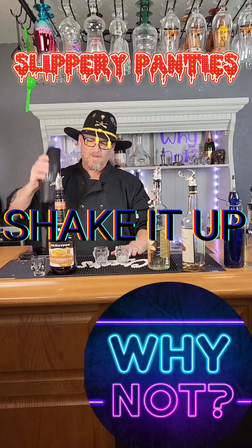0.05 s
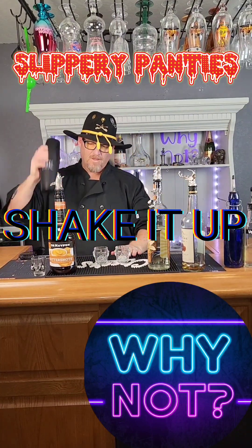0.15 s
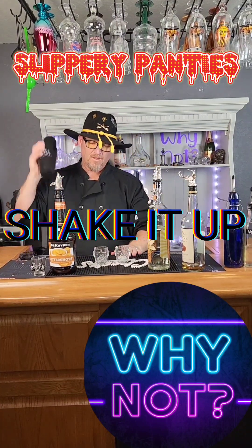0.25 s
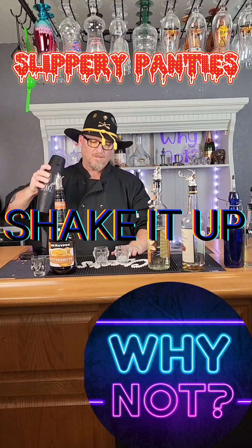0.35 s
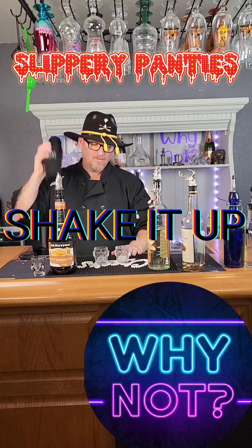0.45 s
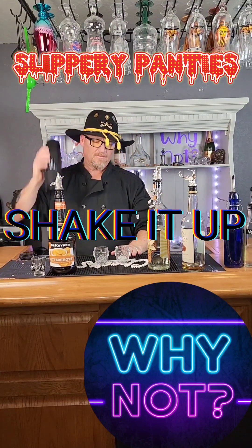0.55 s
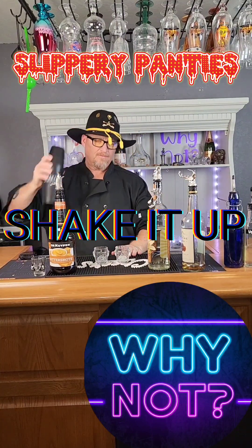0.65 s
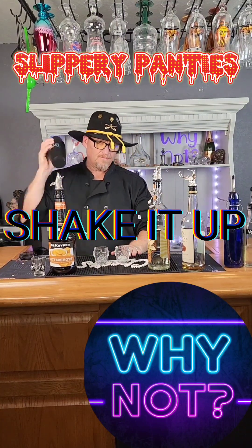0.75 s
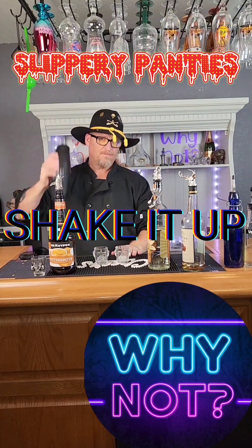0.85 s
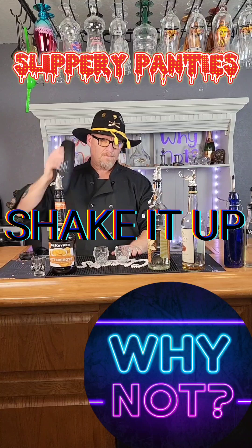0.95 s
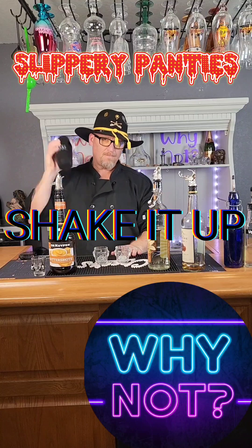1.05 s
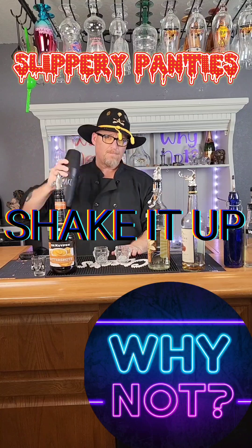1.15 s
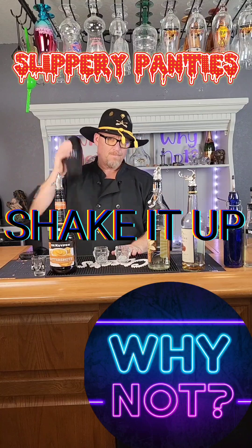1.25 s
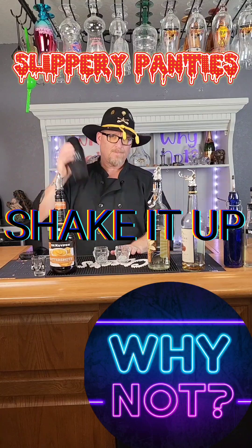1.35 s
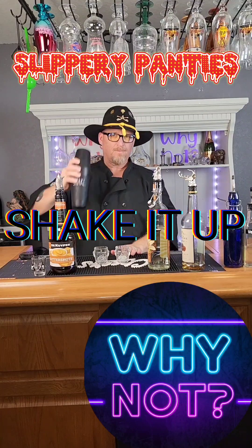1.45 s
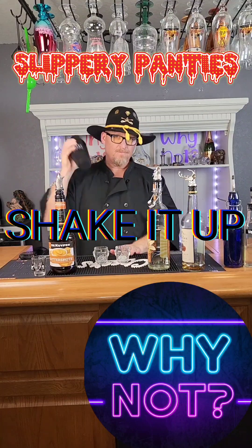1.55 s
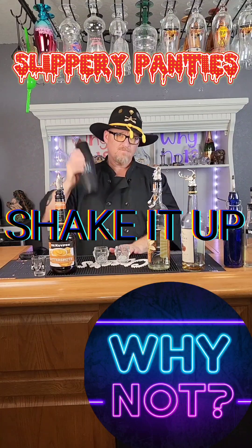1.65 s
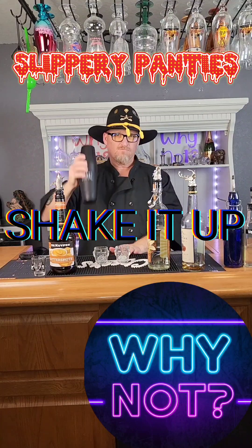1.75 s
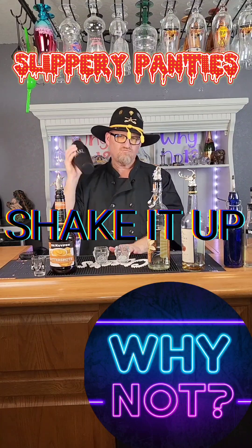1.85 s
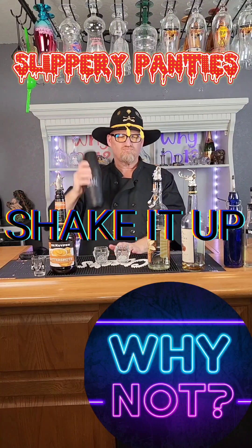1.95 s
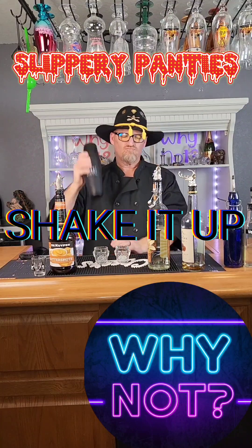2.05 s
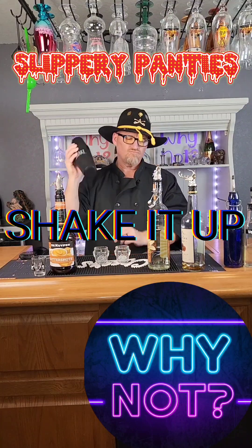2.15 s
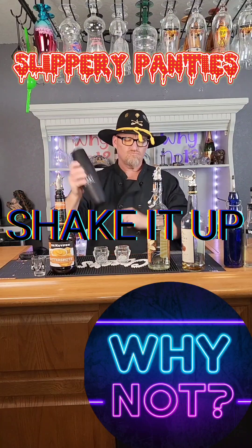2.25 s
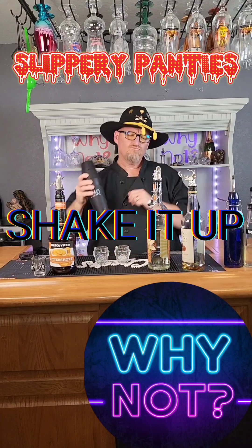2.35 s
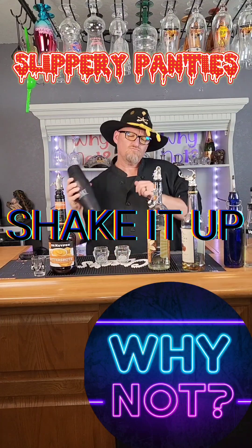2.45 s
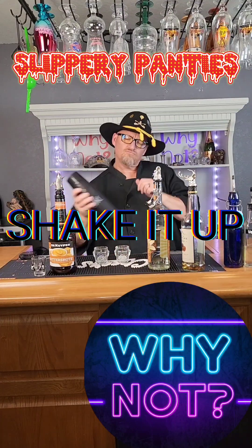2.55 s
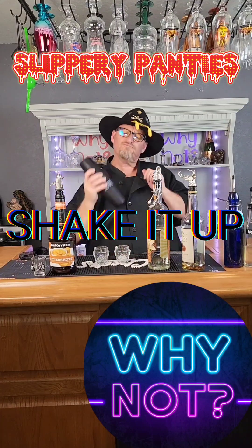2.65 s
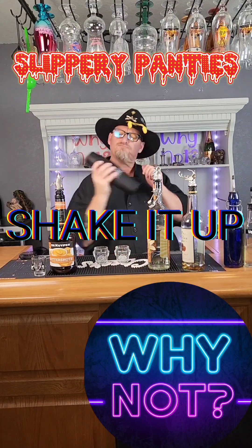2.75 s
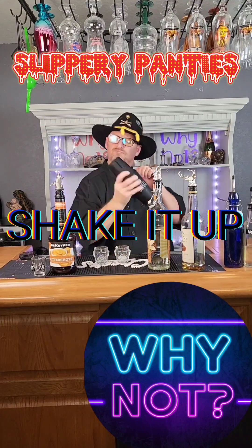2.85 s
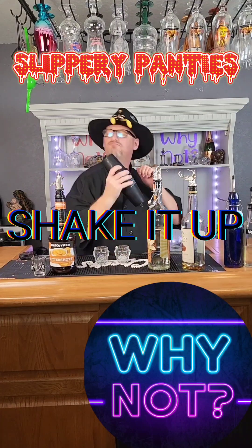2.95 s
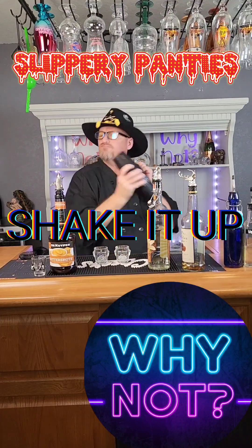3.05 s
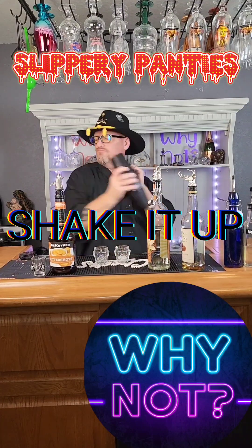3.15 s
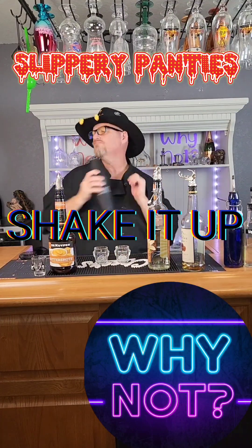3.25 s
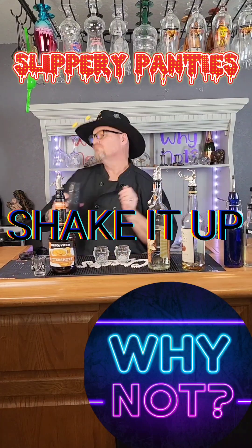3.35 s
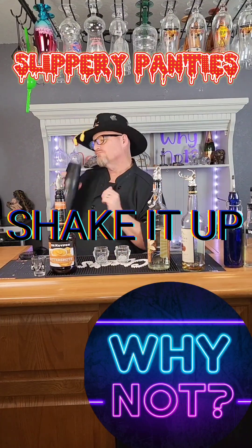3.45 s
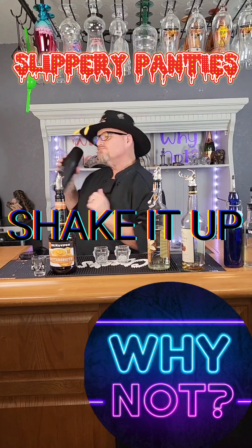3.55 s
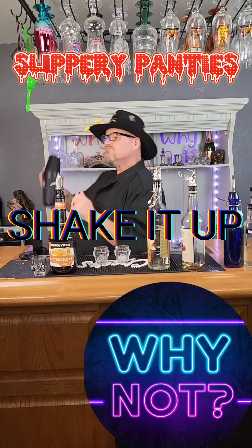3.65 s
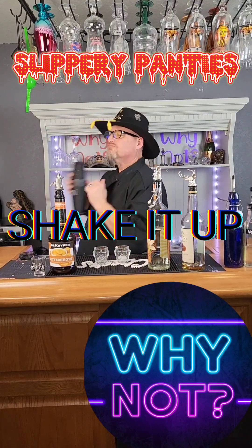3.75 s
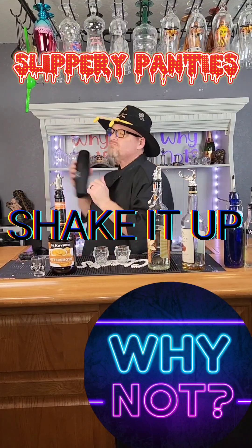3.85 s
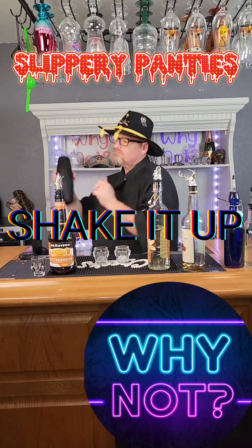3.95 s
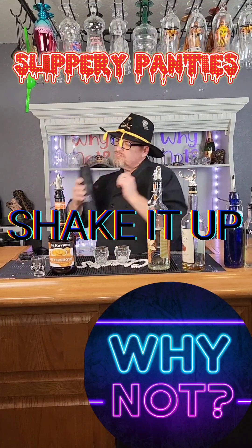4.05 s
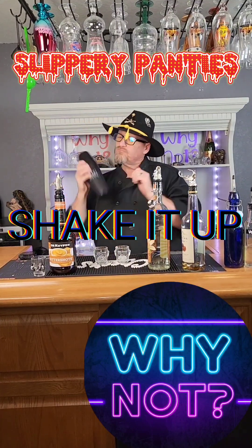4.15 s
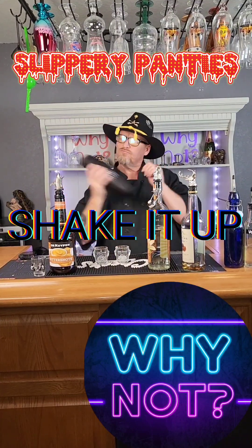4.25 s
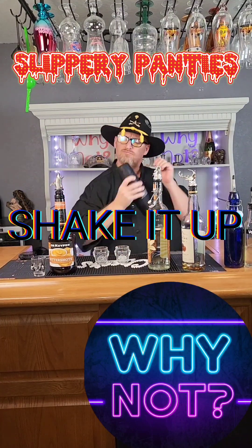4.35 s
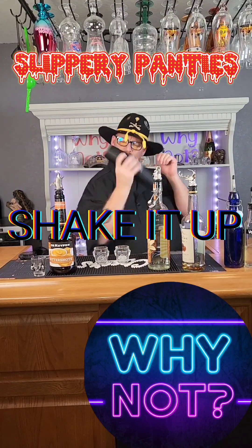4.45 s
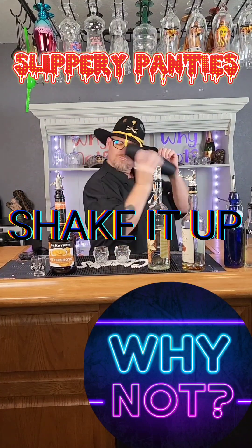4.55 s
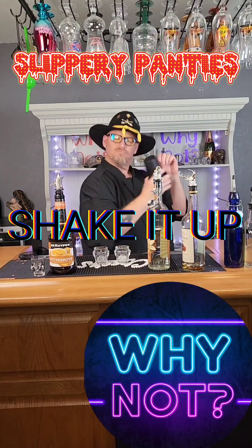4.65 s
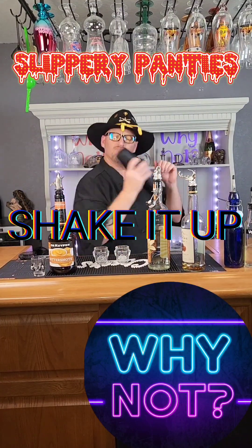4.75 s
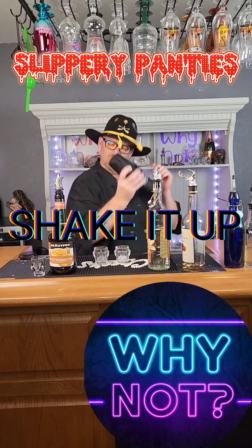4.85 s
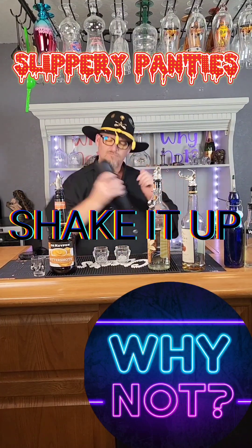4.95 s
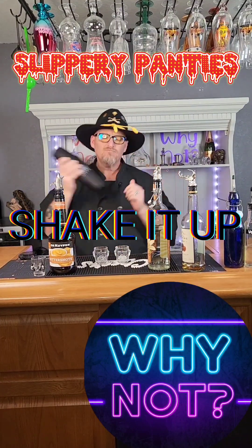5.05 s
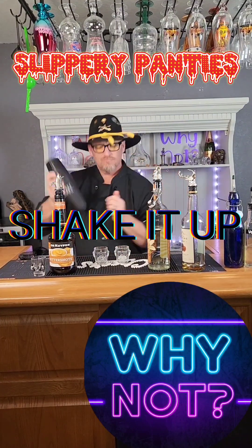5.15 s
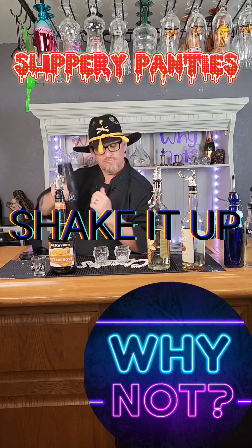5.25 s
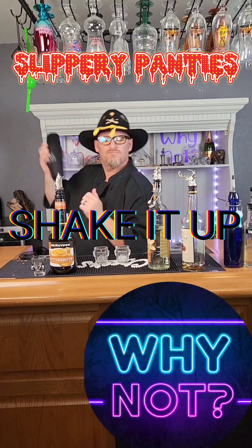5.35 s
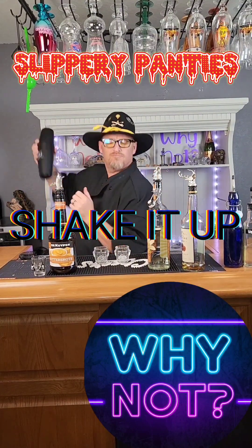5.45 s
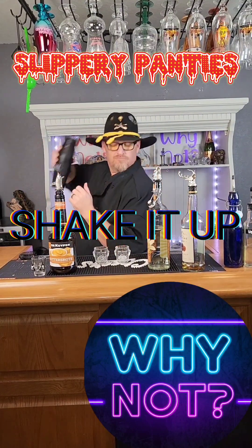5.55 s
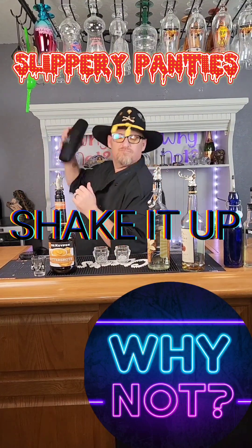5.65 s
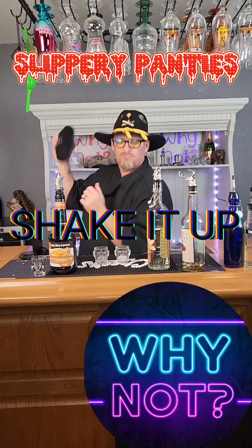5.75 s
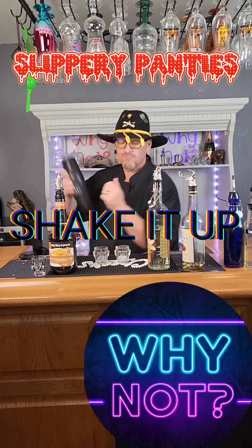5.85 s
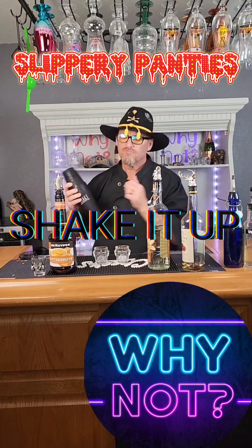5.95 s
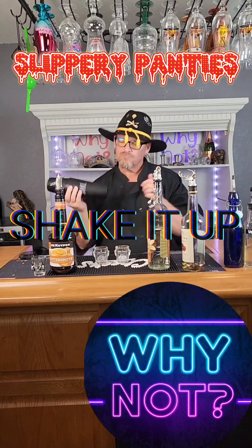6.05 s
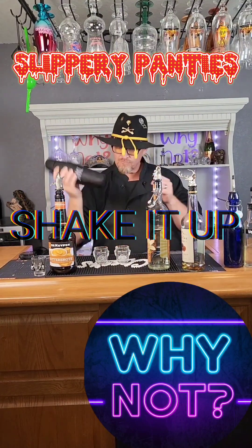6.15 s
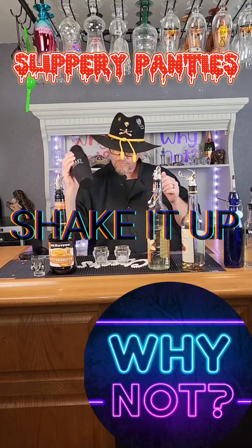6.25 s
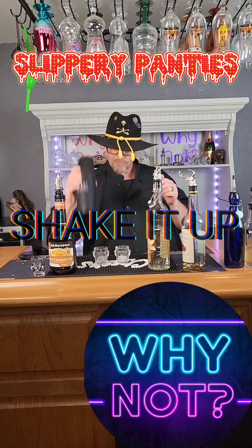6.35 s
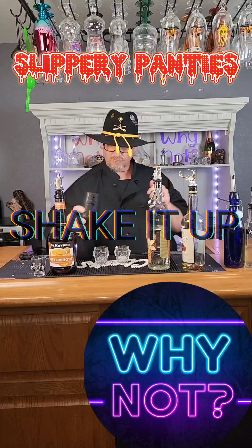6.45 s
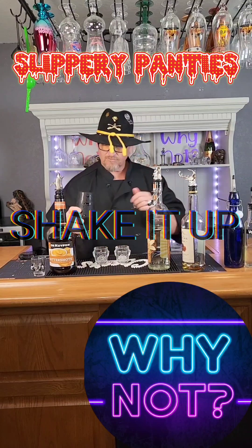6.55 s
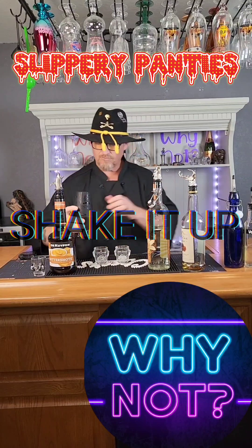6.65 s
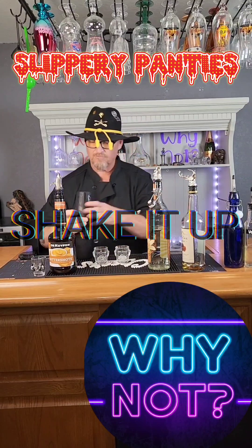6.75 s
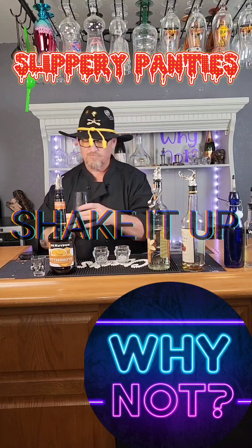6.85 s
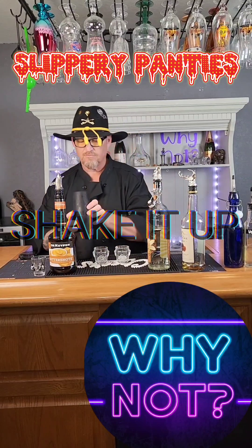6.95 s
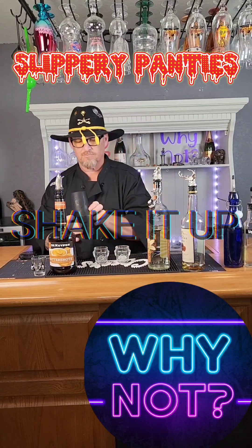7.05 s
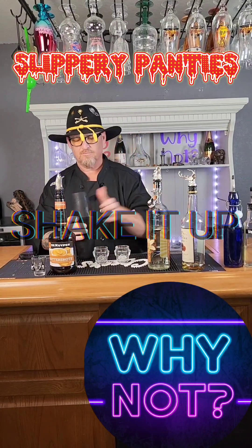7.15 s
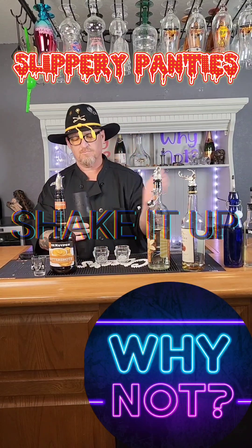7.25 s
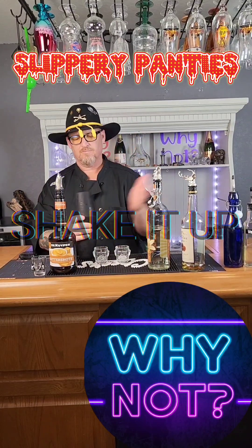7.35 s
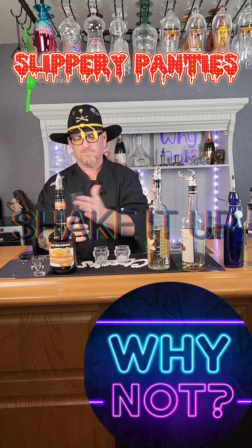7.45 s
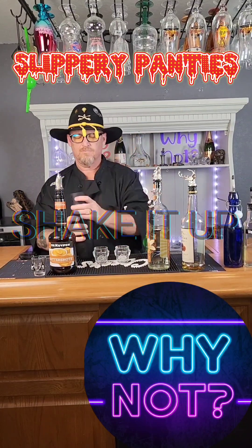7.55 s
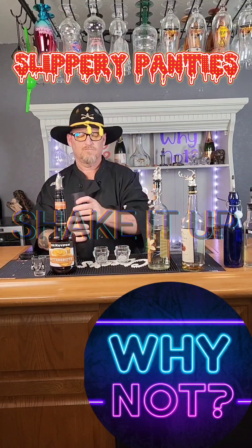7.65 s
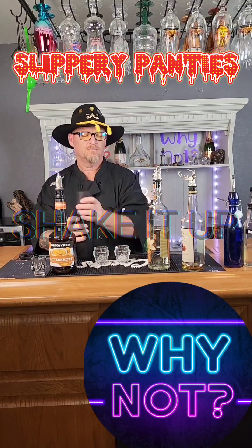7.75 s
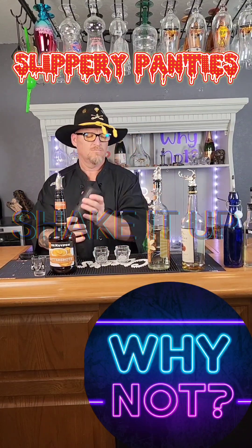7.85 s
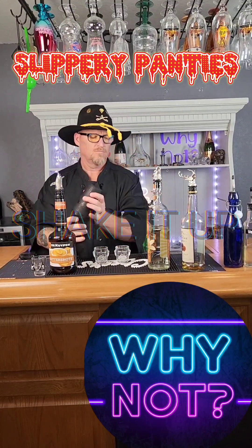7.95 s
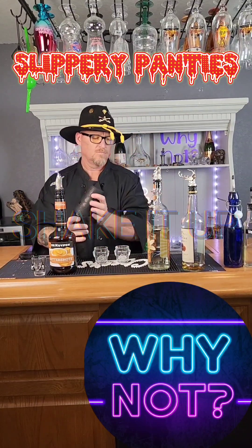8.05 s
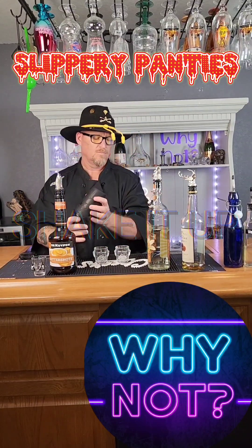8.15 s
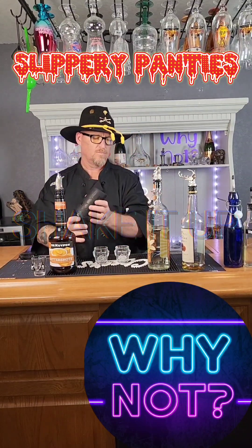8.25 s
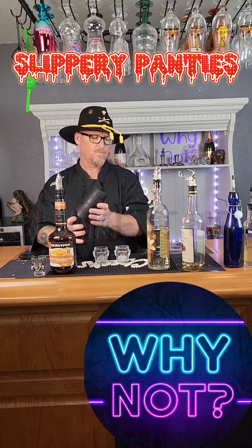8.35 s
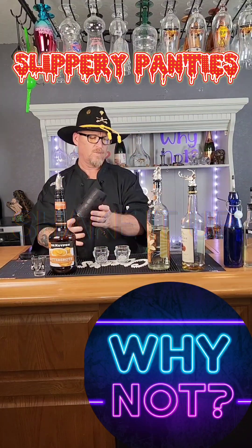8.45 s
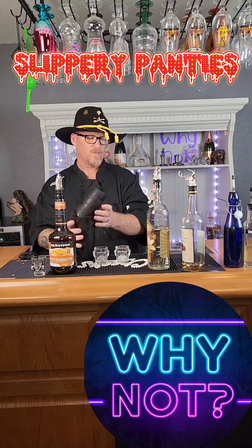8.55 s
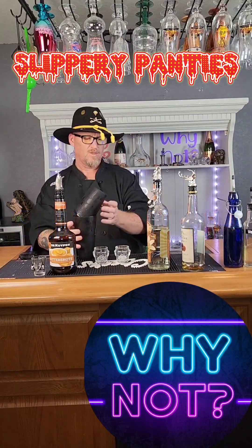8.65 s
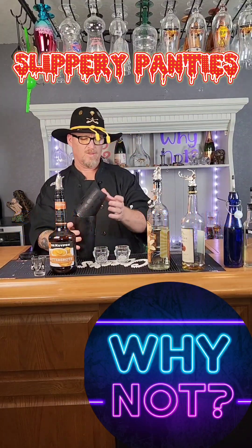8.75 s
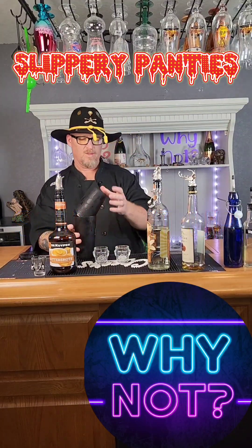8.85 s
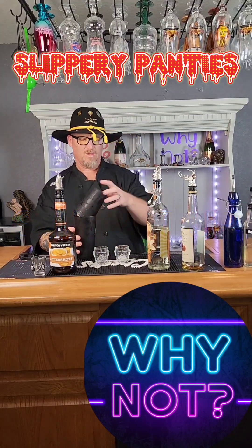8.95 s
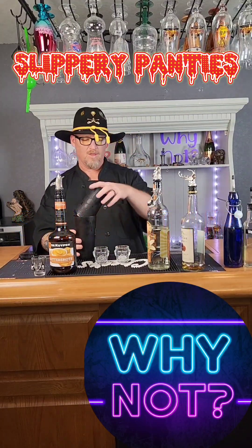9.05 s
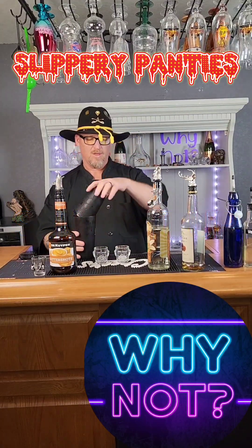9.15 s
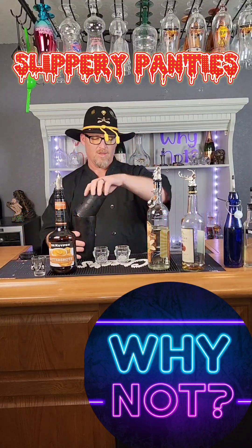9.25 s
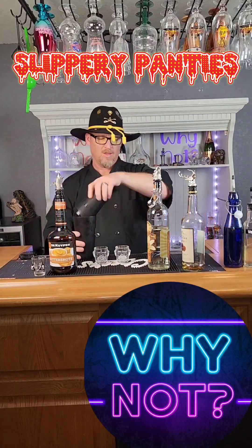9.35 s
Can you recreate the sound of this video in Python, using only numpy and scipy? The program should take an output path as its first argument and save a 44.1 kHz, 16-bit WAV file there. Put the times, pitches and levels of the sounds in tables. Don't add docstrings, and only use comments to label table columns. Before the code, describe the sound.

Vigorous close shaking of ice in a steel shaker slackens, ends with a heavy wooden thud, then a palm slap and faint cap taps.

```python
import sys
import numpy as np
from scipy import signal
from scipy.fft import rfft, irfft
from scipy.io import wavfile

SR = 44100
rng = np.random.default_rng(int(sys.argv[2]) if len(sys.argv) > 2 else 0)


def volts_from_db(level):
    exponent = np.asarray(level, float) / 20
    return 10 ** exponent


def transcribe(u):
    v = np.clip(np.atleast_2d(u).T, -1, 1)
    q = np.round(v * 32767).astype(np.int16)
    wavfile.write(sys.argv[1], SR, q)


N = 414027


def rms_one(x):
    return x / np.sqrt(np.mean(x ** 2) + 1e-20)


def in_time(rows):
    s, *columns = np.transpose(rows)
    return [np.interp(np.arange(N) / SR, s, column) for column in columns]


def at_hz(points, hz):
    points = np.array(points)
    return np.interp(np.log(hz), np.log(np.maximum(points[:, 0], 1)), points[:, 1])


def wander(spread_db, step, mean_db=0):
    count = N // step + 2
    return np.interp(np.arange(N) / step, np.arange(count), rng.normal(mean_db, spread_db, count))


def ring(clicks, hz, t60):
    r, w = volts_from_db(-60 / (t60 * SR)), 2 * np.pi * hz / SR
    return signal.lfilter([.5, 0, -.5], [1, -2 * r * np.cos(w), r * r], clicks + 1e-18)


def marks(times, sizes):
    out = np.zeros(N)
    np.add.at(out, np.round(np.asarray(times) * SR).astype(int), sizes)
    return out


# f/Hz, level/dB per Hz
RUMBLE = [(18, -42.5), (30, -11), (80, -5), (129, -13), (150, -20), (205, -21.5), (282, -27), (322, -31),
          (420, -45), (550, -82.5), (920, -120)]
# f/Hz, level/dB per Hz
HISS = [(250, -26.5), (420, 3), (736, -12), (1270, -9.5), (1700, -15), (1950, -15.5), (2040, -5),
        (2230, -20), (4160, -21.5), (4840, -28.5), (8230, -23.5), (9430, -41.5), (15800, -43)]
# f/Hz, likeness/0-1
LIKENESS = [(60, 1), (240, 0.86), (950, 0.23), (3770, 0.25), (15000, 0.08)]


def background(spectrum, level_db):
    hz = np.maximum(np.fft.rfftfreq(N, 1 / SR), 5)
    mid, side = rfft(rng.standard_normal((2, N)))
    waver_db = np.interp(np.arange(N) / SR / .12, np.arange(200), rng.normal(0, 1.8, size=200))
    alike = np.clip(at_hz(LIKENESS, hz), 0, 1)
    both = np.sqrt(1 + alike) * mid + np.sqrt(1 - alike) * side * [[1], [-1]]
    noise = rms_one(irfft(volts_from_db(at_hz(spectrum, hz)) * both, N))
    return volts_from_db(level_db) * noise * volts_from_db([[.6], [-.6]]) * volts_from_db(waver_db)


def pile_ups(times, levels_db, swell_s):
    t60_s = 0.085
    t = np.arange(SR // 5) / SR
    flurry = (1 - np.exp(-t / swell_s)) * volts_from_db(-2 * 60 * t / t60_s)
    return np.abs(signal.fftconvolve(marks(times, volts_from_db(2 * levels_db)), flurry)[:N])


# level/dB against it, t60/s
JOLT_TRICKLE = [(-11, 1), (-8, 0.62), (-11.5, 0.54), (-8, 0.73)]


def tumbling(times, lengths, levels_db):
    rise_s, rise_share, stop_t60_s = 0.0013, 0.2, 0.038
    stroke_trickle = (-4.5, 1)   # dB, t60 s
    out, t = np.full(N, 1e-14), np.arange(SR) / SR
    trickles = [stroke_trickle] * (len(times) - len(JOLTS)) + JOLT_TRICKLE
    for s, length, level_db, (trickle_db, t60) in zip(times, lengths, levels_db, trickles):
        after = np.maximum(t - length, 0)
        shape = volts_from_db(-2 * 60 * after / stop_t60_s) + volts_from_db(2 * (trickle_db - 60 * after / t60))
        swell = 1 - np.exp(-t / (rise_s + rise_share * length))
        start = int(s * SR)
        out[start:start + SR] += volts_from_db(2 * level_db) * swell ** 2 * shape
    return out


# t/s, tumbling length/s, rattle level/dB,
# then hollow level/dB and slosh level/dB, both against the rattle
FAST = [(.001, 0.022, -25, -7, -14), (0.126, .08, -28.5, -4, -10), (0.245, 0.058, -29, -5.5, -7),
        (.384, 0.15, -31, -0.5, -14.5), (0.547, 0.02, -22.5, -7.5, -15), (0.655, 0.068, -24, -4, -14.5),
        (0.794, 0.03, -29.5, -3, -9.5), (0.928, 0.047, -24, -6, -13.5), (1.063, 0.039, -25.5, -2.5, -10),
        (1.196, 0.044, -26, -6.5, -11.5), (1.319, 0.03, -22, -4.5, -11), (1.451, 0.061, -23.5, -4.5, -12),
        (1.589, 0.078, -25.5, -4, -9.5), (1.736, 0.11, -26.5, -3, -10.5), (1.881, 0.027, -24.5, -5.5, -12),
        (2.019, 0.048, -28, -0.5, -11), (2.16, 0.037, -24.5, -6.5, -10)]
SWIRL = [(2.273, 0.16, -31, -1.5, -8.5), (2.476, 0.11, -33, -2, -9.5), (2.662, 0.079, -34.5, -2, -10.5),
         (2.764, 0.082, -30.5, -5, -10), (2.916, 0.047, -35, 3.5, -10), (2.991, 0.03, -29.5, -23, -15.5),
         (3.044, 0.068, -31.5, -1.5, -5.5), (3.162, 0.061, -28.5, -4.5, -14.5),
         (3.282, 0.023, -33.5, -8, -11), (3.359, 0.034, -41, -8, -5.5), (3.436, 0.16, -28.5, -8.5, -14),
         (3.51, 0.044, -39.5, 6.5, 1.5), (3.723, 0.099, -32, 0.5, -13), (3.865, 0.076, -28, -4, -7),
         (3.921, 0.13, -31, -3.5, -17), (4.06, 0.047, -30.5, -9, -15.5), (4.211, 0.053, -32, -8, -7),
         (4.32, 0.093, -34, -8, -19), (4.393, .05, -32, -2, -15),
         (4.515, 0.082, -31, -1.5, -7.5), (4.62, 0.11, -31, -8, -20), (4.699, 0.037, -32.5, -5, -9),
        (4.82, 0.05, -29.5, -3.5, -11), (4.968, 0.093, -34.5, -7, -11), (5.097, .06, -32, -1, -6.5),
        (5.179, 0.13, -36, -25, -29), (5.29, 0.047, -40.5, -18, -5.5), (5.387, 0.044, -28.5, -4.5, -8.5),
        (5.574, 0.089, -29.5, -0.5, -12.5), (5.74, 0.021, -28.5, -3.5, -13), (5.881, 0.1, -28.5, -7.5, -13),
        (6.062, 0.026, -29, -1, -11), (6.248, 0.0095, -45.5, -2.5, -8.5), (6.413, 0.018, -35, -2.5, -13),
        (6.504, 0.015, -41.5, -11, -15)]
JOLTS = [
    (6.592, 0.092, -26, 6.5, 0.5),
    (7.543, 0.018, -33.5, -9, -5),
    (7.844, 0.054, -47.5, -7.5, -10.5),
    (7.887, 0.047, -41, -14, -9.5),
]
JOLT_CHIPS_DB = [-3, 4.5, -3, 4]
# t/s, rattle level/dB, hollow level/dB against it
CUBES = [(.385, -49, -4), (.931, -49, 0), (1.2, -35.5, 1), (1.451, -50.5, 2.5), (1.884, -23.5, -11.5),
         (2.164, -33, -12.5), (2.717, -52, -5), (4.214, -36, 3), (4.968, -28, -13), (5.88, -38, -67),
         (0.159, -32, -3), (.27, -28.5, -4), (0.41, -32.5, -3), (2.12, -36, -14), (2.486, -32, -12),
         (3.064, -33.5, -6), (3.227, -41, -22), (3.394, -52, -5), (3.455, -43, 10.5), (4.24, -59, -32),
         (4.404, -42, -34), (4.535, -38, 0), (4.9, -35.5, -17), (5.025, -32.5, -7), (5.25, -47, -0.5),
         (5.314, -44, 5.5), (5.43, -49, -15), (5.768, -40, -6), (5.909, -39.5, 8.5), (6.103, -32.5, -5)]
TICKS = [(6.25, -43, -30), (6.505, -62, -23), (6.88, -63.5, -25.5), (6.954, -51, -2), (7.02, -50.5, -12),
         (7.129, -58.5, -6), (7.23, -63.5, -5), (7.257, -55, -8), (7.313, -60.5, -2), (7.462, -73, 6.5),
         (7.551, -29, -7), (7.912, -41, -10), (8.19, -52.5, -17), (8.247, -54.5, -14)]


def motion():
    s, length, level_db, hollow_db, slosh_db = np.transpose(FAST + SWIRL + JOLTS)
    level_db = level_db - 8
    cube_s, cube_db, cube_hollow_db = np.transpose(CUBES + TICKS)

    def zone(against_db, held_db, landing_db, lone_db, gather_s):
        own_db = level_db + against_db
        held = tumbling(s, length, own_db + held_db)
        landing = pile_ups(s, own_db + landing_db, gather_s)
        lone = pile_ups(cube_s, cube_db + lone_db, 0.00047)
        return np.sqrt(held + landing + lone)

    chips_db = -10 + 2 * rng.standard_normal(len(s))
    chips_db[-len(JOLTS):] += JOLT_CHIPS_DB
    slosh = zone(slosh_db, -3.5, 8, -17.0, 0.002)
    hollow = zone(hollow_db, -7.5, 8, cube_hollow_db, 0.0058)
    rattle = zone(0, 0, 5, 0, 0.0069)
    splinter = zone(chips_db, 0, 7.0, -8.5, 0.002)
    return [slosh, hollow, rattle, splinter], np.r_[cube_s, s[-len(JOLTS):]]


def struck_spot(count):
    spread_db, spot_s = 1.8, .02
    for row in rng.standard_normal((count, 600)):
        yield volts_from_db(spread_db * np.interp(np.arange(N) / SR / spot_s, np.arange(len(row)), row))


def cube_contacts(touches):
    contacts_per_s, size_spread_db = 1400, 4.6
    sizes = volts_from_db(size_spread_db * np.minimum(rng.exponential(1, N), 3.6)) * rng.choice([-1, 1], N)
    contacts = rms_one(sizes * (rng.random(N) < contacts_per_s / SR))
    contacts *= volts_from_db(wander(2.8, 330, mean_db=-1))
    return contacts + marks(touches + .0015, 17.0)


# f/Hz, level/dB per Hz
SHELL = [(150, -43), (260, -16), (451, -10), (527, -5), (931, -8), (1230, 1.5), (1820, -4), (3060, -2.5),
         (3510, -8.5), (4100, -0.5), (5890, -10), (8170, -8), (9710, -18), (14200, -15.5), (16000, -42.5)]
# f/Hz, level/dB, t60/s
WALL = [(528, -15, 0.27), (770, 3, 0.023), (1333, -7, 0.039), (1283, 0, 0.033), (1454, 0.5, 0.0896),
        (2134, -6, 0.26), (2980, -1.5, 0.13), (3873, 0, 0.025), (4020, -4.5, 0.038), (4930, -0.5, 0.011)]


def ice():
    drive, touches = motion()
    borders_hz = [1080, 1850, 7000]
    contacts = cube_contacts(touches)
    fizz_share = .3
    blurred = np.sqrt(1 - fizz_share) * contacts + np.sqrt(fizz_share) * rng.standard_normal(N)
    dealt = rng.integers(0, 3, size=N)
    edges = np.geomspace(250, 17000, 27)
    pitches = np.sqrt(edges[1:] * edges[:-1])
    zone = np.searchsorted(borders_hz, pitches)
    weight = volts_from_db(at_hz(SHELL, np.minimum(pitches, 13500))) * np.sqrt(pitches)
    out, spot = np.zeros(N), struck_spot(count=50)
    for k, (low, high) in enumerate(zip(edges, edges[1:])):
        share = weight[k] / np.linalg.norm(weight[zone == zone[k]])
        source = blurred if zone[k] == len(borders_hz) else contacts
        struck = (-1) ** k * source * drive[zone[k]] * next(spot) + 1e-18
        band = signal.butter(2, [low, high], "band", fs=SR, output="sos")
        out += share * signal.sosfilt(band, struck) * np.sqrt(.5 * SR / (high - low))
    for k, (hz, level_db, t60) in enumerate(WALL):
        struck = contacts * (dealt == k % 3) * drive[np.searchsorted(borders_hz, hz)] * next(spot)
        out += volts_from_db(level_db - 14.0) * ring(struck, hz, t60) * np.sqrt(83 / (t60 * SR))
    return out


# t/s, level/dB, contact cut-off f/Hz, deep boom level/dB
BLOWS = [(2.717, -33, 970, 3), (5.674, -31.5, 400, -10.5), (6.59, -6.5, 490, -9.5), (6.605, -7.5, 810, 6),
         (6.612, -18.5, 600, -25), (6.621, -11.5, 584, -7.5), (6.635, -13, 600, -5), (6.648, -22, 900, -3),
         (6.697, -39, 404, -3), (6.745, -20.5, 198, -5), (7.556, -30.5, 900, -15), (7.578, -30.5, 252, 11),
         (7.598, -28, 90, 15), (7.914, -33.5, 503, 0), (7.945, -42, 200, 17)]
# f/Hz, level/dB, t60/s
COUNTER = [(46.9, -18.5, 0.38), (78, -4.5, 0.073), (99, 1, 0.067), (122, -10, 0.19), (182, -8, 0.052),
           (260.4, -4.5, 0.045), (290, -0.5, 0.06), (324, -3.5, 0.06), (347, -5, 0.087), (400, -8, 0.081),
           (506, -7, 0.082), (550, -23, .09), (615, -31.5, 0.051), (760, -8, 0.016)]


def counter():
    out, luck = np.zeros(N), rng.normal(0, 1, (len(BLOWS), len(COUNTER)))
    for (s, level_db, cut_hz, boom_db), row in zip(BLOWS, luck):
        start, push = int(s * SR), np.zeros(SR // 2)
        push[0] = volts_from_db(level_db - 9.0)
        push = signal.sosfilt(signal.butter(2, cut_hz, fs=SR, output="sos"), push)
        for k, (hz, mode_db, t60) in enumerate(COUNTER):
            strength = (-1) ** k * volts_from_db(mode_db + 3.8 * row[k] + boom_db * (k < 3))
            out[start:start + SR // 2] += strength * ring(push, hz, t60)
    return out


def counter_crack():
    t = np.arange(N) / SR - BLOWS[2][0]
    burst = (t > 0) * (1 - np.exp(-np.abs(t) / 0.0041)) * volts_from_db(-17.0 - 60 * np.abs(t) / 0.48)
    grains = rng.standard_normal(N) * rng.exponential(1, N) * (rng.random(N) < .1)
    dull = signal.butter(1, [1000, 3000], "band", fs=SR, output="sos")
    return signal.sosfilt(dull, rms_one(grains) * burst)


# t/s, f/Hz, level/dB
SQUEAK = [
    (7.29, 420, -90),
    (7.32, 420, -65),
    (7.42, 425, -66),
    (7.5, 420, -72),
    (7.53, 420, -90),
]


def squeak():
    hz, level_db = in_time(SQUEAK)
    grip_db = wander(3.5, 600)
    return volts_from_db(level_db + grip_db) * np.sin(2 * np.pi * np.cumsum(hz) / SR) * (level_db > -89.9)


# t/s, level/dB
SLAP = [
    (7.5415, -11),
    (7.5505, -1),
]


def slap():
    times, levels_db = np.transpose(SLAP)
    crack = signal.butter(1, [900, 9000], "band", fs=SR, output="sos")
    return signal.sosfilt(crack, marks(times, volts_from_db(levels_db + 4.5)))


# t/s, level/dB
CAP_TAPS = [
    (8.192, -40.5),
    (8.246, -27.5),
]
# f/Hz, level/dB, t60/s
CAP = [(452, 4.5, 0.092), (570, 8, 0.029), (680, -19, 0.037), (810, -31, 0.037), (1180, -8, 0.036),
       (1470, -6, 0.095), (2390, -15, .05)]


def cap():
    times, levels_db = np.transpose(CAP_TAPS)
    taps = signal.lfilter([.3], [1, -.7], marks(times, volts_from_db(levels_db - 23.0)))
    return sum(volts_from_db(level_db) * ring(taps, hz, t60) for hz, level_db, t60 in CAP)


def room(x):
    t60_s, level_db, dull_hz, own_above_hz = 0.26, 2.5, 6780, 520
    right_lag_s, lag_spread_s = .0001, 0.0001845
    t, hop = np.arange(int(.4 * SR)) / SR, 2048
    low = signal.butter(1, own_above_hz, fs=SR, output="sos")
    high = signal.butter(1, own_above_hz, "high", fs=SR, output="sos")
    dull = signal.butter(1, dull_hz, fs=SR, output="sos")
    early = np.exp(-t / 0.13)
    dying = volts_from_db(-60 * t / t60_s) * (1 - np.exp(-t / .004))
    fade = np.hanning(2 * hop + 1)[:-1]
    x = np.pad(x, (hop, 2 * hop))
    out = np.zeros((2, len(x) + len(t)))
    for i in range(0, N + hop, hop):
        shared, left, right = rng.standard_normal((3, len(t)))
        noise = signal.sosfilt(low, shared) + signal.sosfilt(high, [left, right])
        tail = (early * noise + (1 - early) * signal.sosfilt(dull, noise)) * dying
        tail *= volts_from_db(level_db) / np.sqrt(np.sum(tail ** 2, axis=1, keepdims=True))
        lag = np.clip((right_lag_s + lag_spread_s * rng.standard_normal()) * SR, -25, 25)
        tail[:, :64] += np.sinc(np.arange(64) - 32 - np.array([[0], [lag]]))
        moment = (fade * x[i:i + 2 * hop])[None]
        out[:, i:i + 2 * hop + len(t) - 1] += signal.fftconvolve(moment, tail, axes=1)
    return out[:, hop + 32:hop + 32 + N]


def scene():
    knocks = counter() + cap()
    bar = ice() + counter_crack() + slap() + squeak() + volts_from_db(5.5) * knocks
    heard = room(bar) + knocks
    left_db = 1.07
    placed = volts_from_db(-4.5) * heard * volts_from_db([[left_db], [-left_db]])
    return placed + background(RUMBLE, -50.5) + background(HISS, -69.5)


def roll_off(x):
    return signal.sosfilt(signal.butter(12, 16660, fs=SR, output="sos"), x)


def record(dry):
    top = signal.cheby2(10, 60, 16900, fs=SR, output="sos")
    rounded = 1.508 * np.tanh(dry / 0.8)
    return roll_off(signal.sosfilt(top, rounded))


dry = scene()
out = record(dry)
transcribe(out)
```